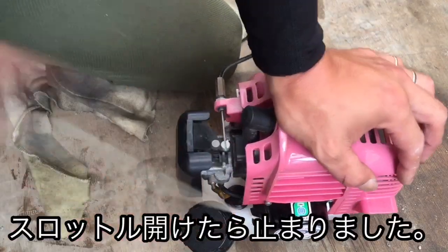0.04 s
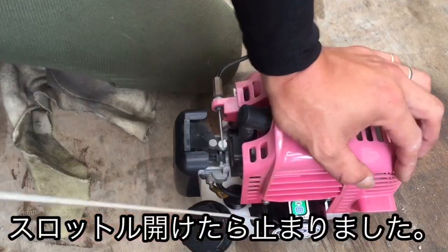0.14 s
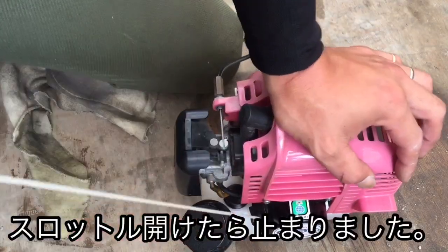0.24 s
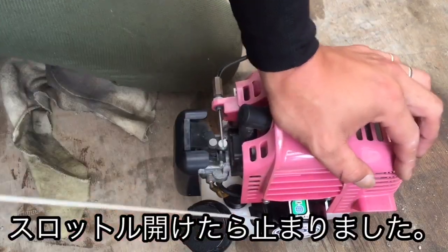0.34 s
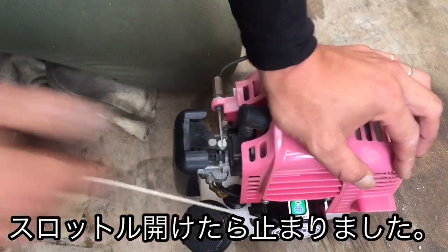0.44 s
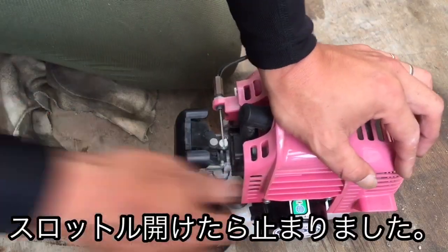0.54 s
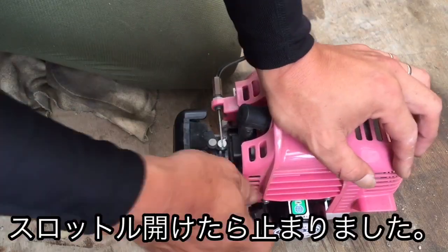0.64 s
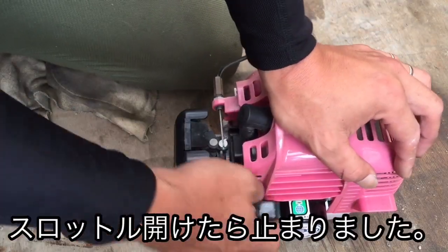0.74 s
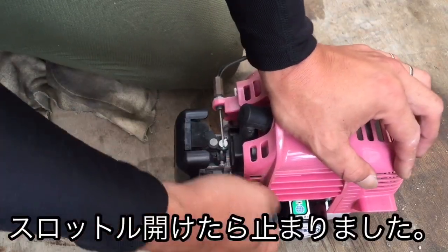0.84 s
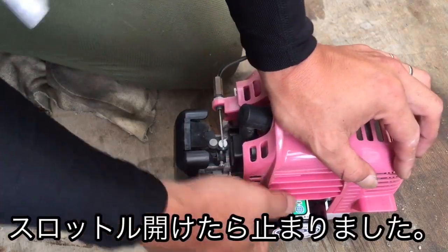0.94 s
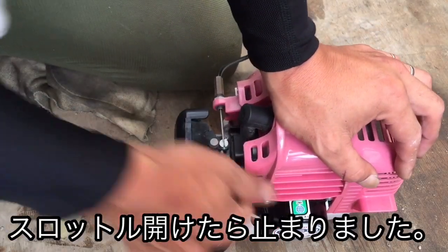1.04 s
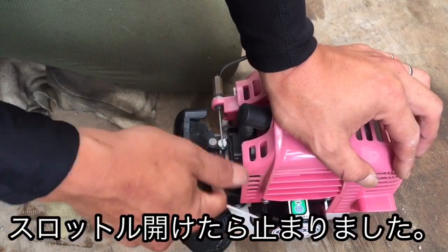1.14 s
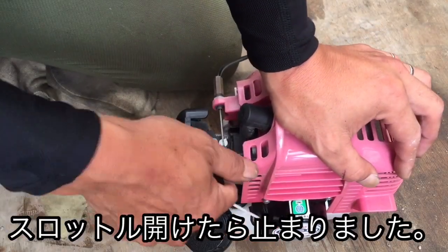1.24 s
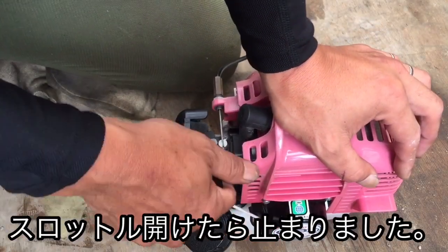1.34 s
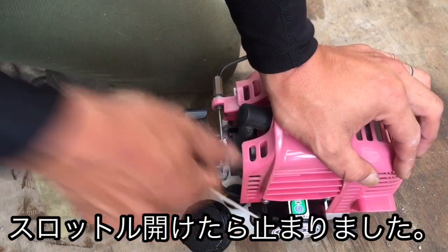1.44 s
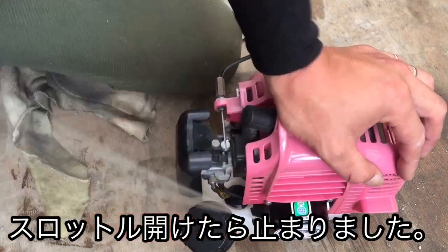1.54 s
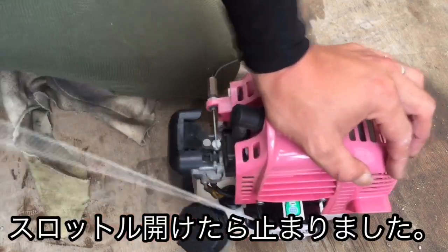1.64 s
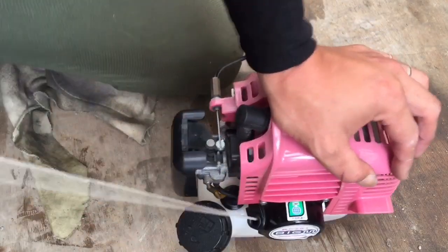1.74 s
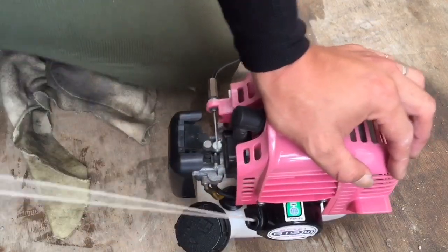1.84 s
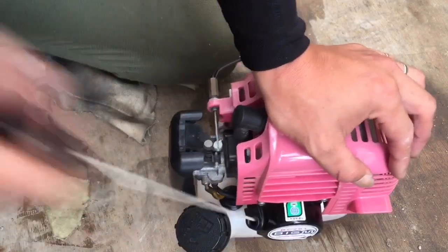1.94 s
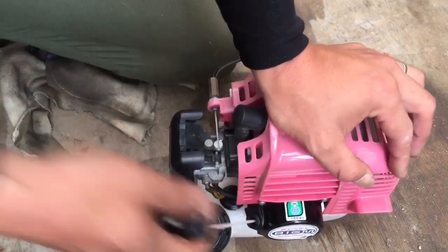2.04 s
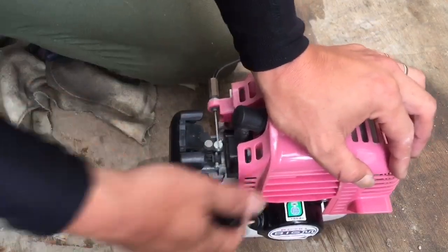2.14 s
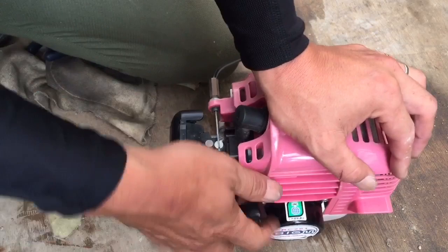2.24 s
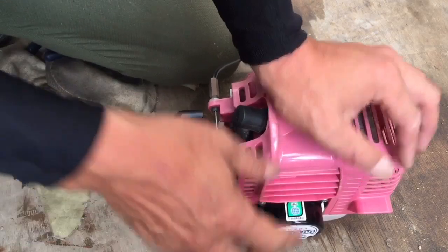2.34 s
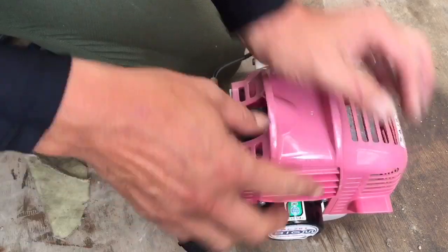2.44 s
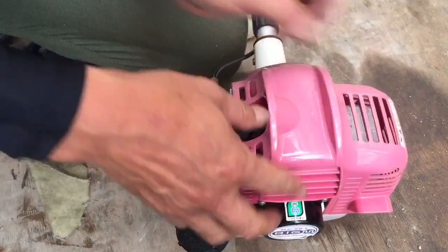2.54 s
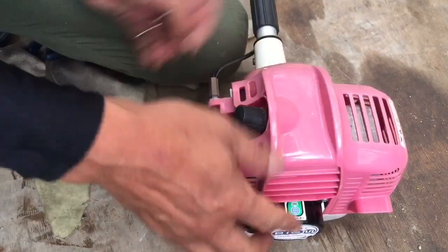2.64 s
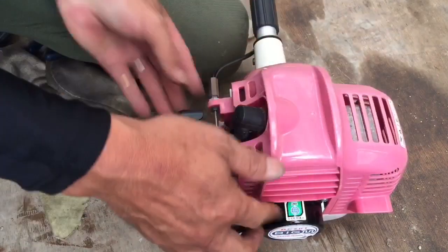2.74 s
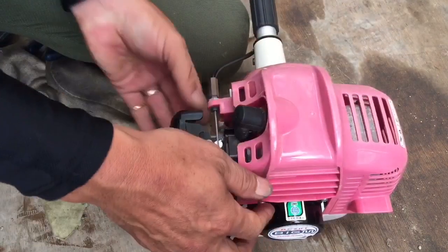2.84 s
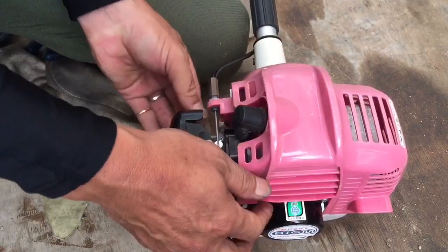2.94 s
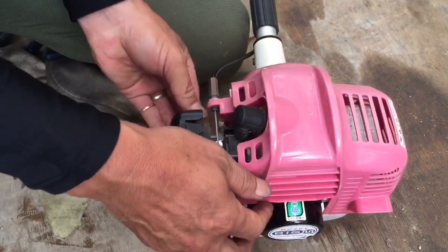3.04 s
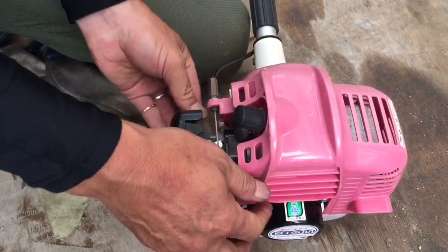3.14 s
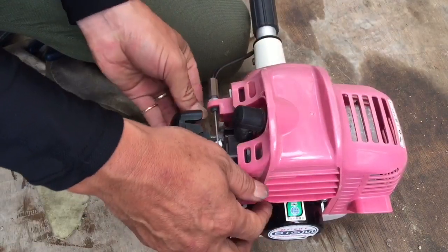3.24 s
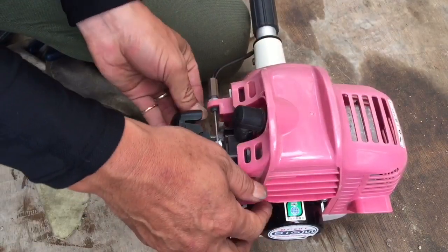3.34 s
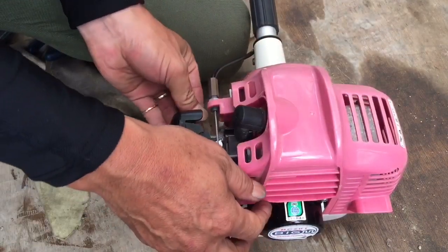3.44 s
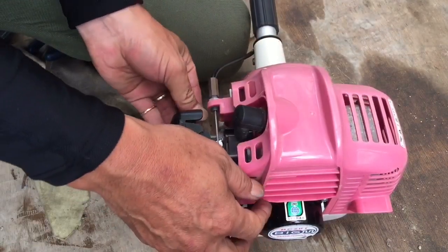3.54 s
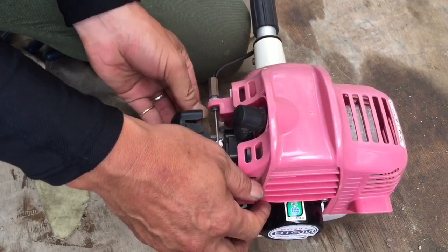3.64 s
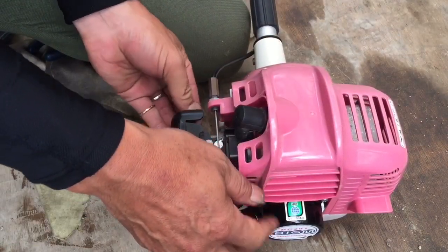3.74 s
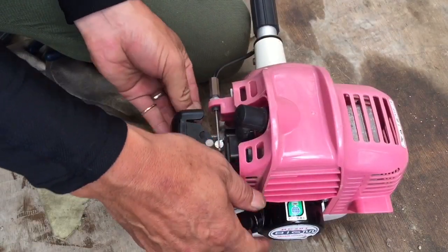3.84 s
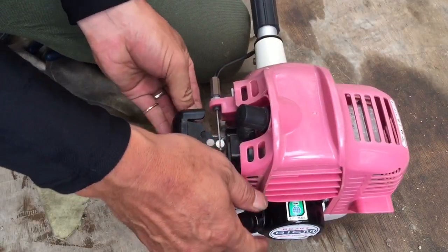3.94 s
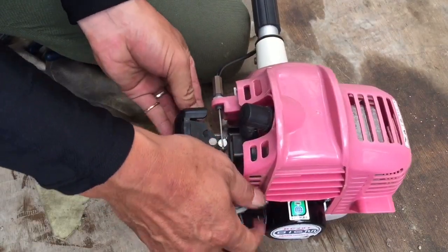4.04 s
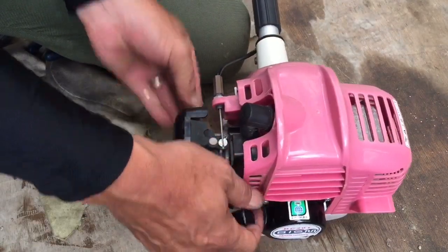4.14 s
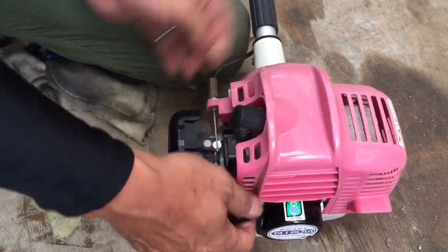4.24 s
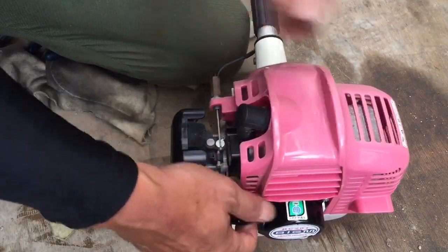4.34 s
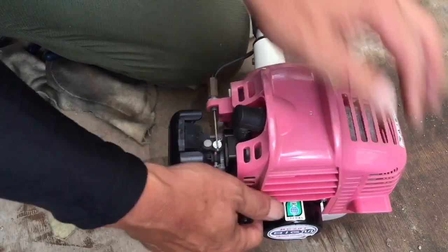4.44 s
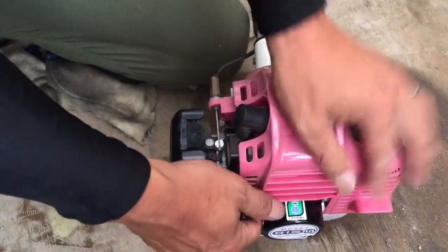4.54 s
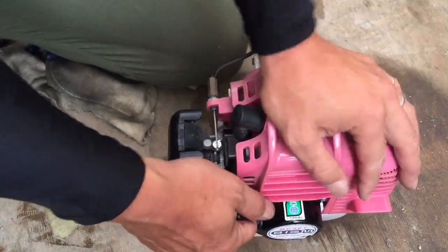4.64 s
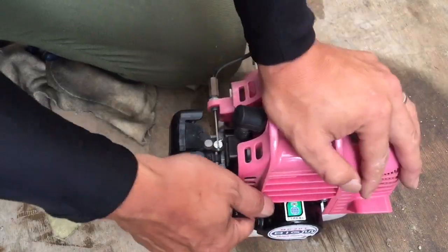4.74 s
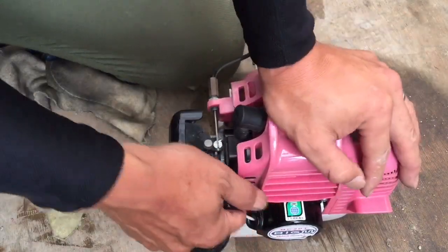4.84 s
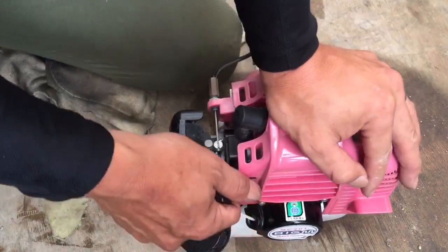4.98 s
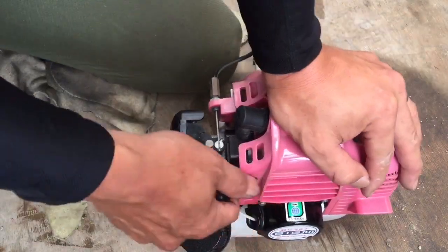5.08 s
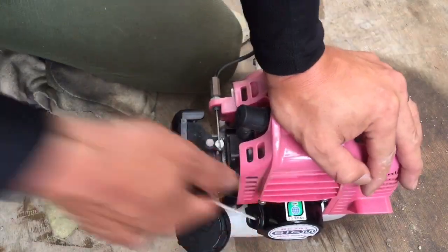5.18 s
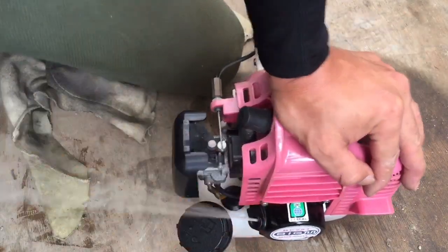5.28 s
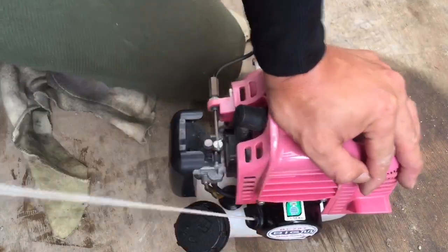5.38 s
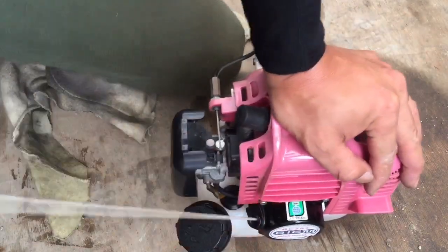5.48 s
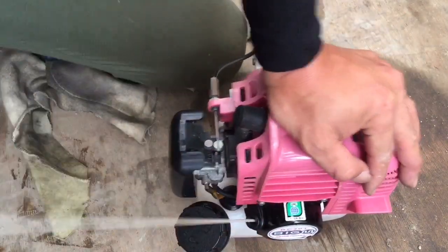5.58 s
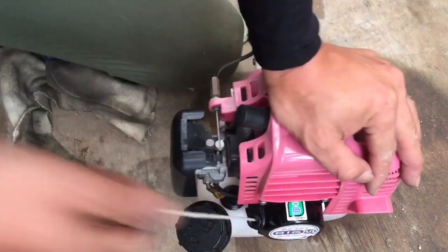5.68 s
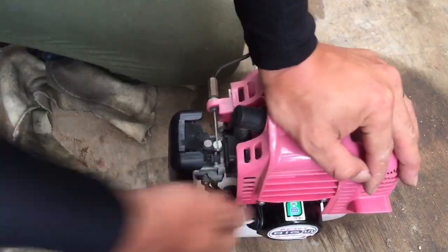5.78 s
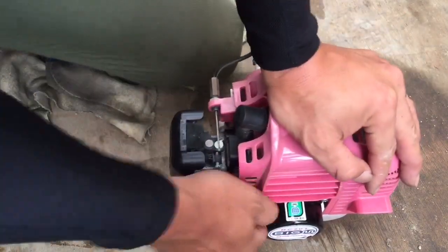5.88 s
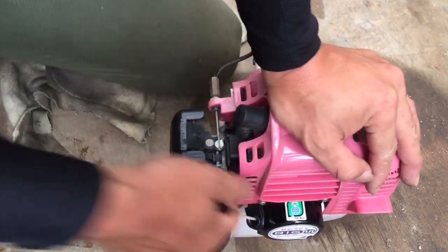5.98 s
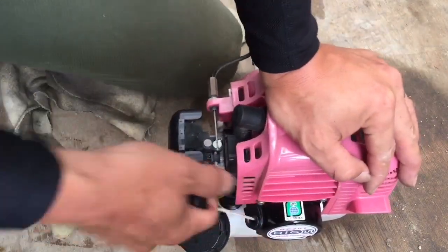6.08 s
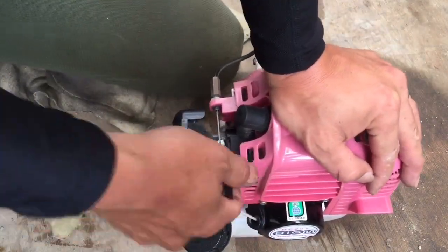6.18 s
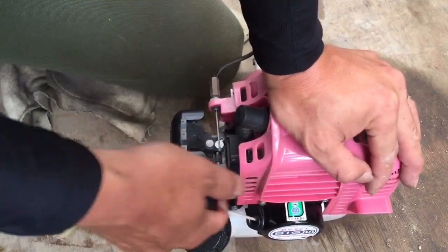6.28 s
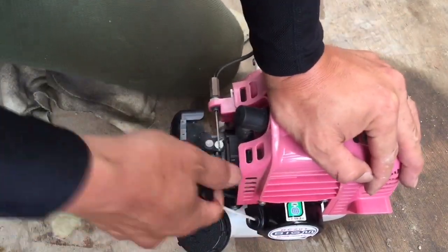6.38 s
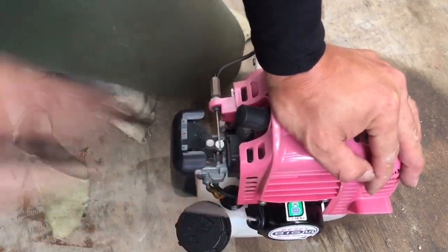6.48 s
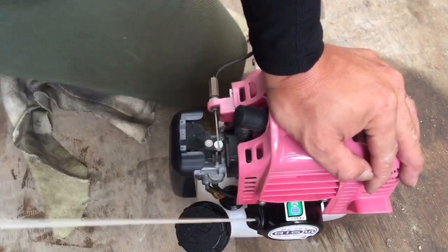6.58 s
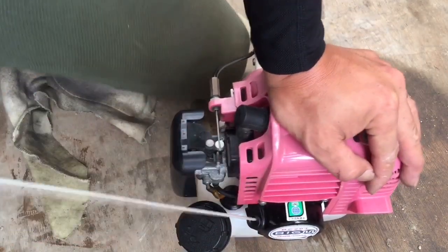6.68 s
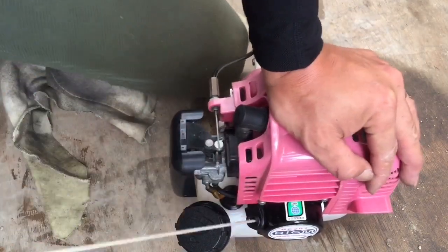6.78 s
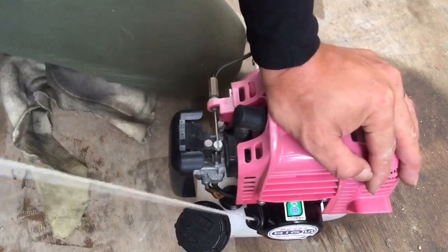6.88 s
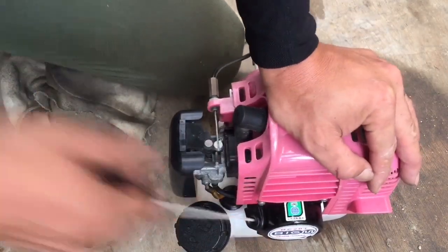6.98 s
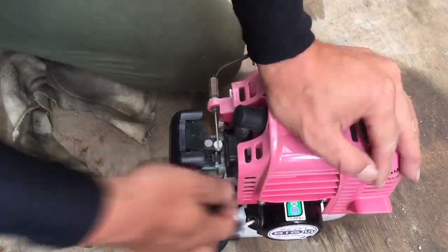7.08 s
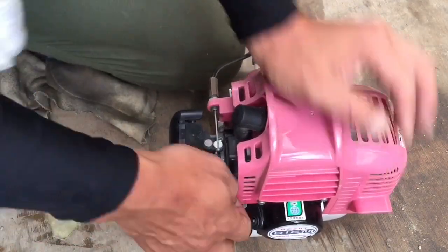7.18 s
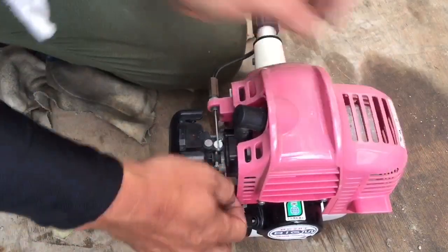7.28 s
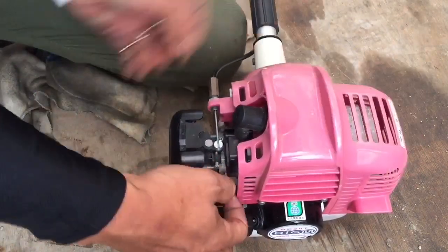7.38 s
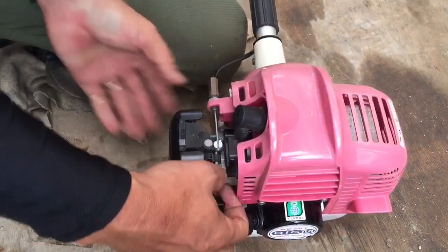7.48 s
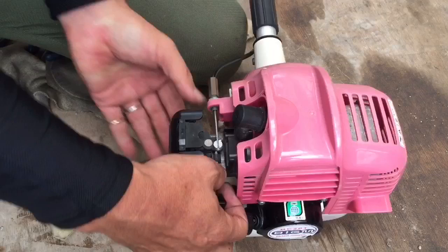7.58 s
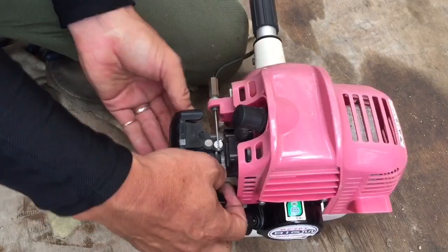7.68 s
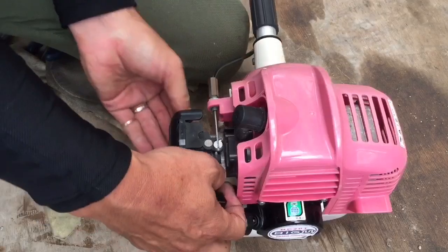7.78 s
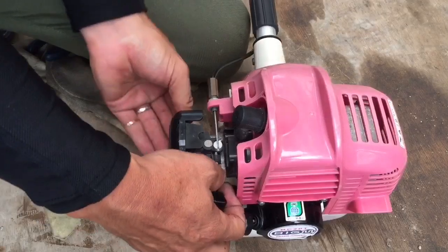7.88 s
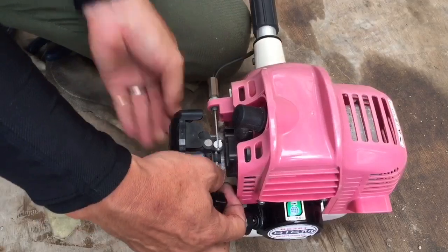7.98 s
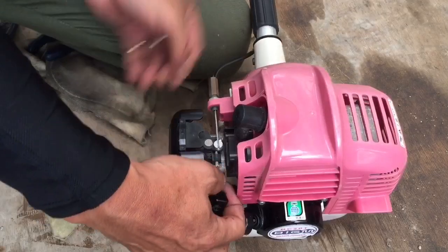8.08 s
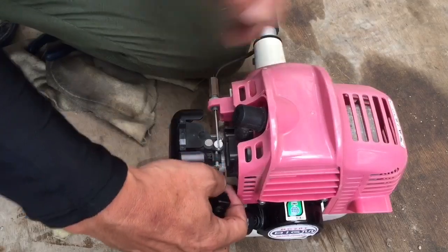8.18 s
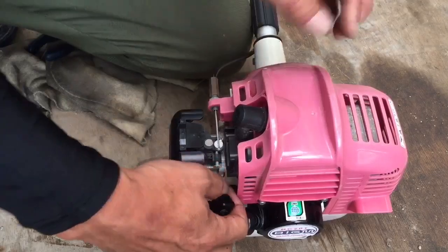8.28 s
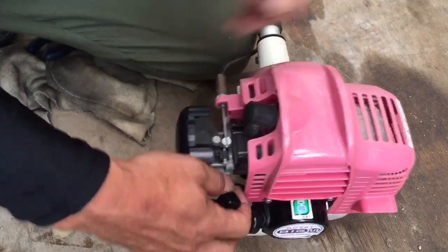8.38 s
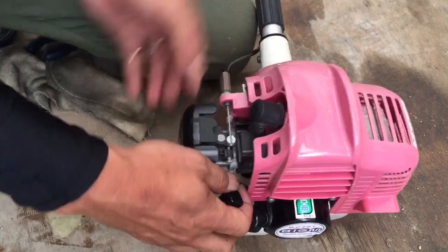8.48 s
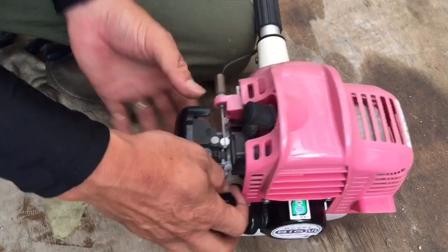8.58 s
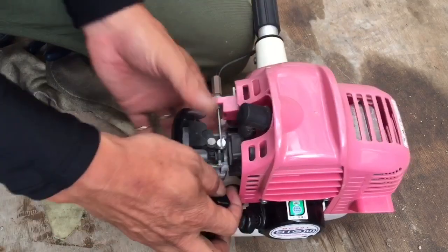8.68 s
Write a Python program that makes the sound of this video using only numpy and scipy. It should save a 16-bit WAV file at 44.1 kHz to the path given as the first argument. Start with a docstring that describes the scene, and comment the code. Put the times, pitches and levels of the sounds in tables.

```python
"""A yard, one microphone close to a small two-stroke engine that is pulled over four times by its
starter rope and does not catch. Each turn puffs through the muffler; rope, pawl and piston scrape and
clatter; the steel starter cup rings as the rope rewinds; handle and fingers knock on the plastic
housing. Far off, machinery hums, and a thin high whine throbs behind it all."""
import sys
import numpy as np
from scipy import signal
from scipy.fft import rfft, irfft, next_fast_len
from scipy.io import wavfile
from scipy.ndimage import uniform_filter1d, map_coordinates

SR = 44100
rng = np.random.default_rng(int(sys.argv[2]) if len(sys.argv) > 2 else 0)


def file_out(sig):
    """Save sig as 16-bit WAV at sys.argv[1]."""
    # one column per channel
    cols = np.atleast_2d(sig).T
    # limit, then scale
    lim = np.clip(cols, -1, 1)
    pcm = np.round(lim * 32767).astype(np.int16)
    wavfile.write(sys.argv[1], SR, pcm)


N = 384552

# modes of the steel starter cup: (frequency [Hz], level [dB], t60 [s])
CUP_MODES = [(1112, 4, 0.015), (1478, -2.5, 0.047), (2034, 4, 0.018), (2164, 2, 0.029), (2600, -5.5, 0.048),
             (3264, -10.5, 0.12), (3750, 0, 0.017), (4183, -3, 0.057), (4360, -14.5, 0.15),
             (5360, -6, 0.072), (5706, -8.5, 0.062), (6570, -5, 0.048), (9600, -23, 0.04)]
BODY_HZ = 1150  # blows pitched above this lose low band and land more quickly


def amp(db):
    """Decibels to amplitude."""
    return 10 ** (np.asarray(db) / 20)


def unit(x):
    """x at an rms of 1."""
    return x / np.sqrt(np.mean(x ** 2) + 1e-20)


def along(points, hz):
    """Read (frequency [Hz], value) points on a log axis."""
    f, values = np.transpose(points)
    return np.interp(np.log(hz + 1), np.log(f + 1), values)


def wobble(rate):
    """A smooth random curve, rate knots a second."""
    return map_coordinates(rng.standard_normal(int(N * rate / SR) + 4), [np.arange(N) * rate / SR])


def filtered(x, response):
    """x through a complex frequency response."""
    size = next_fast_len(x.shape[-1] + 8192)
    return irfft(rfft(x, size) * response(np.fft.rfftfreq(size, 1 / SR)), size)[..., :x.shape[-1]]


def fading(x, seconds):
    """Give every sample an exponential tail."""
    return signal.lfilter([1], [1, -np.exp(-1 / (seconds * SR))], x)


def resonances(modes):
    """Causal response of modes: (frequency [Hz], width [Hz], level [dB], polarity)."""
    return lambda f: sum(sign * amp(db) * 1j * f * width / (hz * hz - f * f + 1j * f * width)
                         for hz, width, db, sign in modes)


def three_bands(x):
    """Low, middle and high band of x, each at an rms of 1."""
    return [unit(filtered(x, lambda f: 1 / (1 + (lo / (f + 1)) ** 8) / (1 + (f / hi) ** 8)))
            for lo, hi in [(450, 1500), (1500, 7000), (7000, 20000)]]


def patchy(x, depth_db, bins, frames):
    """x with random patches of gain in time and frequency."""
    spectra = signal.stft(x, nperseg=256)[2]
    patches = uniform_filter1d(rng.standard_normal(spectra.shape), size=bins, axis=0)
    patches = uniform_filter1d(patches, size=frames, axis=1)
    return signal.istft(spectra * amp(depth_db * unit(patches)), nperseg=256)[1][:N]


def yard():
    """Far off: patchy rumble and hiss under the wavering hum of machinery."""
    # spectrum of the rumble and hiss: (frequency [Hz], relative density [dB])
    spectrum = [(15, -50.5), (25, -15), (91, -3.5), (140, -6), (188, -1.5), (389, -18), (457, -16.5),
                (495, -27), (782, -22.5), (895, -24), (2630, -34.5), (3000, -36), (3260, -37),
                (13000, -49.5), (14300, -59), (15500, -57.5)]
    # machinery and mains tones: (frequency [Hz], rms level [dB], waver [dB])
    hum_tones = [(104.6, -81.5, 6), (205.3, -77.5, 2), (235.5, -88, 5), (302, -93.5, 3.5), (464, -83, 0.5),
                 (2902.5, -111, 1), (2919.3, -100, 1.5), (2936, -109, 1), (2945.2, -95, 1.8),
                 (2961.6, -110, 1), (2971, -104, 2), (3408, -105.5, 4), (3705, -109, 4), (3849, -109, 3),
                 (4210, -108, 3.5), (4237, -108, 3.5)]
    t = np.arange(N) / SR
    noise = patchy(rng.standard_normal(N), 1.5, bins=3, frames=24)
    out = amp(-69.5 + 0.48 * wobble(2.4)) * unit(filtered(noise, lambda f: amp(along(spectrum, f))))
    for hz, db, waver_db in hum_tones:
        level = np.sqrt(2) * amp(db + waver_db * wobble(21))
        out += level * np.sin(2 * np.pi * hz * t + 0.18 * waver_db * wobble(9.7))
    return out


def whine():
    """In the background, thin and very high tones throb together at a steady rate."""
    # closely spaced tones: (frequency [Hz], rms level before the throb [dB])
    tones = [(15450, -107), (15552, -96), (15617, -106), (15685, -90.5)]
    throb_hz, depth, peak_s = 16.65, .6, .025
    t = np.arange(N) / SR
    out = np.zeros(N)
    for hz, db in tones:
        out += np.sqrt(2) * amp(db + 1.5 * wobble(21)) * np.sin(2 * np.pi * hz * t + .5 * wobble(16))
    return out * (1 + depth * np.cos(2 * np.pi * throb_hz * (t - peak_s)))


def walls(x):
    """The surrounding walls answer about 7 ms late; the treble dies first."""
    # decay of the reflections: (frequency [Hz], t60 [s])
    decay = [(200, 0.35), (2000, 0.23), (10000, 0.17)]
    hz, t, spectra = signal.stft(rng.standard_normal(SR // 2), SR, nperseg=256)
    tail = signal.istft(spectra * amp(-60 * t / along(decay, hz)[:, None]), SR, nperseg=256)[1]
    return signal.fftconvolve(np.pad(x, (300, 0)), tail / np.linalg.norm(tail))[:N]


def rewinding(s):
    """True while the pawl has let go and the rope runs back into the free-ringing cup."""
    # rewinds of the rope: (start [s], end [s])
    rewinds = [(2.07, 2.3), (5.67, 5.9), (6.84, 7.3)]
    return sum((s >= start) & (s < end) for start, end in rewinds) > 0


def friction(strokes, spectrum, catches_per_s, catch_db, grain_db, colour_db):
    """Grainy noise that catches and slips; part of it rings through the steel cup.
    Each stroke is a curve of (time [s], level [dB], low band [dB], high band [dB])."""
    catches = (rng.random(N) < catches_per_s / SR) * rng.exponential(size=N)
    slips = 1 + amp(catch_db) * fading(catches, 0.0028)
    grit = slips * amp(grain_db * wobble(600)) * rng.standard_normal(N)
    grit = patchy(grit, colour_db, bins=8, frames=4)
    low, middle, high = three_bands(filtered(grit, lambda f: amp(along(spectrum, f))))
    cup = resonances([(hz, 2.2 / t60, db + 3 * np.log(t60), (-1) ** k)
                      for k, (hz, db, t60) in enumerate(CUP_MODES)])
    cup_share = np.where(rewinding(np.arange(N) / SR), .24, .12)
    middle = np.sqrt(1 - cup_share) * middle + np.sqrt(cup_share) * unit(filtered(grit, cup))
    out = np.zeros(N)
    for stroke in strokes:
        s, *levels = np.transpose(stroke)
        span = np.arange(round(s[0] * SR), round(s[-1] * SR))
        fade = np.minimum(1, np.minimum(span - span[0], span[-1] - span) / 400)
        gain, low_gain, high_gain = [amp(np.interp(span / SR, s, db)) for db in levels]
        out[span] += fade * gain * (middle[span] + low_gain * low[span] + high_gain * high[span])
    return out


def thinning(hz):
    """Low-band gain of a blow in dB: the higher its pitch, the thinner it is."""
    return np.clip(-9 * np.log2(hz / BODY_HZ), -12, 0)


def blows(events, modes, ring_db, gain_db, attack_s, spread):
    """Each blow is a noise burst plus the body's modes, strongest near its own pitch.
    Events: (time [s], level [dB], low band [dB], high band [dB], t60 [s], pitch [Hz])."""
    floor_hz = 610  # a blow carries little below this
    out, t = np.zeros(N + SR), np.arange(SR // 3) / SR
    for s, db, low_db, high_db, t60, pitch in events:
        dull_db = max(0, -high_db)  # a dull blow is narrower, rings more and rolls off sooner
        rise_s = attack_s * np.sqrt(BODY_HZ / pitch)  # a higher blow is a harder, quicker contact
        damping = min(1, t60 / 0.023)  # a short blow stays in contact and deadens the ring
        ring = np.zeros(len(t))
        for hz, mode_db, mode_t60 in modes:
            near_db = 10 * np.exp(-(np.log(hz / pitch) / .07) ** 2)
            envelope = amp(mode_db + near_db + rng.normal(0, 4.7) - 60 * t / (mode_t60 * damping))
            ring += envelope * np.sin(2 * np.pi * hz * rng.normal(1, 0.0079) * t)
        burst = rng.standard_normal(len(t)) * amp(-60 * t / max(t60, .003))
        width = spread / (1 + 0.037 * dull_db)
        burst = filtered(burst, lambda f: 1 / (1 + (np.log((f + 1) / pitch) / width) ** 2))
        onset = (1 - np.exp(-t / rise_s)) ** 2
        sound = onset * (burst + amp(ring_db + 0.26 * (dull_db - 12)) * ring)
        rolloff = lambda f: amp(-0.22 * dull_db * np.clip(np.log((f + 1) / (1.2 * pitch)) / 2.1, 0, 1))
        sound = filtered(sound, lambda f: rolloff(f) / (1 + (floor_hz / (f + 1)) ** 4))
        # each band's level is that of its first milliseconds
        low, middle, high = [band / np.sqrt(np.mean(band[:200] ** 2)) for band in three_bands(sound)]
        start = round((s - rise_s) * SR)
        out[start:][:len(t)] += amp(db + gain_db) * (middle + amp(low_db) * low + amp(high_db) * high)
    return out[:N]


def finger_rubs():
    """Fingers and sleeve rub on the housing; each rub swells and falls away."""
    # rubs: (peak time [s], level [dB], rise [s], fall [s], low band re rub [dB], high band re rub [dB])
    rubs = [(1.0, -83.5, 0.18, 0.16, 10, -10), (1.11, -70.5, 0.057, 0.088, -9, -12),
            (1.175, -70, 0.077, 0.074, -4, -25.5), (1.23, -71, 0.077, 0.062, -10, -26),
            (2.335, -64.5, 0.059, 0.06, 2, -14.5), (6.075, -64, 0.049, 0.098, -7.5, -22),
            (6.15, -58, 0.059, 0.062, -6.5, -19.5), (7.79, -76, 0.12, 0.2, -14, -30),
            (7.96, -76, 0.05, 0.057, -12, -20), (8.077, -64, 0.027, 0.027, -9, -4),
            (8.03, -77.5, 0.17, 0.23, -20, 3), (8.125, -63, 0.082, 0.059, 1.5, -17),
            (8.364, -65, 0.038, 0.096, -3, -0.5)]
    # spectrum of the rubbing: (frequency [Hz], relative density [dB])
    spectrum = [(260, -13), (450, 11), (515, -1), (794, 11), (1260, 3), (1600, 6.5), (6150, -19),
                (13600, -49.5), (14800, -66), (16000, -27)]
    fade_db = 21
    strokes = [[(s - rise, db - fade_db, *bands), (s, db, *bands), (s + fall, db - fade_db, *bands)]
               for s, db, rise, fall, *bands in rubs]
    return friction(strokes, spectrum, catches_per_s=240, catch_db=-0.5, grain_db=1, colour_db=0)


def housing_knocks():
    """Handle and fingers knock on the plastic housing, which rings briefly."""
    # knocks: (time [s], level [dB], pitch [Hz], high band re knock [dB], t60 [s])
    knocks = [(0.6998, -35, 2140, -3.5, 0.021), (0.714, -23.5, 1740, -23, 0.016),
              (0.7219, -27.5, 1960, -5, 0.04), (0.835, -69, 5600, -14, .01), (0.848, -72, 6300, -1, 0.011),
              (0.982, -72, 1050, -25, .025), (1.008, -71.5, 1900, -12, 0.018),
              (0.8992, -69, 5470, -21, .02), (1.091, -63, 3020, -12, 0.017), (1.096, -46, 1120, -3, 0.021),
              (1.109, -57, 1650, -26, 0.03), (1.139, -62, 2010, -29.5, 0.02),
              (2.3065, -47.5, 6900, -10, 0.02), (2.311, -50, 2900, -9.5, 0.035),
              (2.3144, -61, 1300, -13, 0.022), (2.3253, -51.5, 5400, -11.5, 0.014),
              (2.3264, -60, 900, -20, 0.035), (2.3388, -53.5, 5400, -11.5, 0.011),
              (2.341, -52.5, 1190, -20, 0.02), (2.357, -68.5, 1600, -14, 0.03),
              (2.376, -68, 1000, -23, 0.02), (2.5004, -59.5, 1650, -44, 0.014),
              (2.501, -59, 2410, -47, 0.027), (2.5575, -68, 6470, -11, .027), (4.228, -64, 5480, -19, 0.02),
              (4.3331, -63.5, 1090, -8, 0.046), (4.3504, -57, 1140, -15, 0.022),
              (4.3787, -64, 6400, -21, 0.039), (4.4363, -69.5, 860, -21, 0.059),
              (4.5887, -69.5, 840, -15, 0.061), (4.639, -70, 830, -23.5, 0.036),
              (4.691, -52, 4240, -14, 0.025), (4.692, -58, 1300, -26, 0.039),
              (4.706, -64, 1500, -11.5, 0.053), (5.606, -46, 1400, -28, 0.02),
              (5.618, -32, 1276, -32, 0.012), (5.6186, -29, 2900, -19, 0.0082),
              (5.9048, -40.5, 5700, -9, 0.012), (5.907, -34.5, 1340, -19.5, 0.044),
              (5.9355, -46, 2100, -9, 0.044), (5.952, -58, 1090, -15.5, 0.016),
              (6.048, -58, 1500, -22, 0.01), (6.059, -45, 1090, -5.5, 0.019),
              (6.137, -54, 2360, -26, 0.047), (7.239, -56.5, 1670, -24.5, 0.011),
              (7.285, -56, 1680, -29, 0.018), (7.3068, -44.5, 1570, -27, 0.0082),
              (7.364, -70, 946, -20, 0.018), (7.9384, -64, 2850, -5.5, 0.01),
              (7.9359, -60, 5900, 2, 0.0092), (7.9919, -63, 6550, -6, 0.0062),
              (8.016, -77.5, 6000, -4, 0.02), (8.045, -73, 5900, -4, 0.02), (8.068, -69, 1500, -14, 0.03),
              (8.097, -64, 1660, -22, 0.025), (8.112, -71, 960, -22, 0.017), (8.123, -66, 1130, -20, 0.03),
              (8.137, -63, 1500, -26, 0.02), (8.152, -70, 2000, -25, 0.02), (8.3443, -54, 5560, -2, 0.048),
              (8.3482, -59.5, 930, -5, 0.049), (8.3647, -55.5, 960, -2.5, 0.019)]
    # modes of the housing: (frequency [Hz], level [dB], t60 [s])
    housing_modes = [(725, -2, 0.017), (1130, 3, 0.021), (1360, -2, 0.019), (1648, -3.5, 0.025),
                     (1953, -4.5, 0.026), (2385, -2.5, 0.013), (3460, -18.5, 0.0061), (4070, -17, 0.033),
                     (5500, -18.5, 0.018), (6480, -12.5, .012), (8600, -24, 0.01)]
    events = [(s, db, 2.5 + thinning(hz), high_db, t60, hz) for s, db, hz, high_db, t60 in knocks]
    return blows(events, housing_modes, ring_db=-12.5, gain_db=-8, attack_s=.0016, spread=0.65)


def rocking_and_ringing():
    """The engine rocks on the ground; thin steel parts ring on once rope or handle stops."""
    # low thuds of the rocking: (time [s], level [dB], frequency [Hz], t60 [s])
    thuds = [(0.712, -24.5, 177, 0.034), (5.905, -42, 212, 0.077), (7.97, -38.5, 74.6, 0.035),
             (8.533, -51, 62, 0.31)]
    # ringing steel parts: (time [s], level [dB], frequency [Hz], t60 [s])
    rings = [(.722, -60, 1896, .52), (.722, -66, 1913, .4), (.722, -61, 1630, 0.3),
             (7.183, -64, 4400, 0.32), (7.182, -74, 3240, .3)]
    out, t = np.zeros(N + SR), np.arange(SR // 2) / SR
    onset = 1 - np.exp(-t / 0.0053)
    for s, db, hz, t60 in thuds + rings:
        out[round(s * SR):][:len(t)] += onset * amp(db - 60 * t / t60) * np.sin(2 * np.pi * hz * t)
    return out[:N]


def rope_scrape():
    """The starter rope scrapes, brighter as it gets louder and duller as it runs back."""
    # one curve a pull, from slack to rewind: (time [s], level [dB], low band re scrape [dB])
    pulls = [
        [(0.03, -78, -6), (0.105, -61.5, -8), (0.125, -50, -4.5), (0.2, -47, -1), (0.275, -44, 0.5),
         (0.31, -52, -3), (0.45, -47.5, -9.5), (0.6, -52.5, -4.5), (0.69, -51.5, -14), (0.74, -52, 7.5),
         (0.78, -70, 4.5), (0.86, -94, -9)],
        [(1.5, -92, 3), (1.585, -66.5, -8), (1.605, -46, -10.5), (1.63, -53, -3), (1.685, -40.5, -5.5),
         (1.725, -43.5, -5.5), (1.8, -52, 2), (1.862, -50.5, 2.5), (1.93, -49, -2.5), (1.946, -49, -9),
         (1.962, -46.5, -23), (2.03, -61, 0), (2.068, -62.5, -8), (2.125, -49.5, -24), (2.17, -55, -16),
         (2.24, -70.5, -2.5), (2.3, -81.5, -16)],
        [(5.24, -96, -3), (5.285, -70, -1), (5.32, -69, -9), (5.345, -48, -9), (5.39, -49, 1), (5.5, -43, -6.5),
         (5.565, -52, -20), (5.595, -41, -15.5), (5.63, -44.5, -11), (5.665, -56.5, -2.5), (5.72, -44.5, -21),
         (5.8, -50.5, -16), (5.86, -49, -14), (5.945, -64.5, 6), (6.0, -75, -9)],
        [(6.46, -104, -8), (6.53, -71, 0), (6.57, -54, -13.5), (6.71, -45, -7), (6.83, -55, -15),
         (6.9, -43, -19), (7.02, -56.5, -13), (7.08, -49, -28), (7.17, -64.5, -16), (7.22, -70, -4),
         (7.3, -83, -12)],
    ]
    # spectrum of the scrape: (frequency [Hz], relative density [dB])
    spectrum = [(260, -34.5), (450, 0), (500, -3), (818, -6.5), (908, -6.5), (1120, -6.5), (1750, 0.5),
                (2620, 0), (2870, -0.5), (4230, -5), (4770, -8), (6530, -7.5), (7580, -18.5),
                (11200, -24.5), (13000, -18), (16000, -32.5)]
    brightest_at_db = -49.5
    high_db = lambda s, db: -12 if rewinding(s) else -7 + 0.2 * min(0, db - brightest_at_db)
    strokes = [[(s, db, low_db, high_db(s, db)) for s, db, low_db in pull] for pull in pulls]
    return friction(strokes, spectrum, catches_per_s=300, catch_db=-8, grain_db=1.5, colour_db=3.5)


def compressions():
    """One compression for every whole turn of the crankshaft: (time [s], level [dB])."""
    # the crankshaft, one curve a pull: (time [s], speed [turns/s], puff level [dB])
    crank_curves = [
        [(0.1365, 16.2, -24.4), (0.179, 30.78, -35.9), (0.194, 35.93, -25), (0.252, 33.03, -35.5),
         (0.279, 40.53, -36), (0.292, 39.43, -35.4), (0.317, 37.32, -29.3), (0.424, 28.29, -28.6),
         (0.4428, 34.18, -30), (0.455, 38.01, -27.5), (0.47, 35.36, -25.8), (0.558, 19.82, -32.7),
         (0.582, 27.24, -32.5), (0.597, 31.88, -27), (0.6584, 18.19, -29.2)],
        [(1.6161, 20.25, -24.9), (1.665, 41.06, -27.1), (1.779, 28.2, -30.2), (1.807, 47.83, -34.8),
         (1.834, 28.25, -29.6), (1.895, 35.99, -28.3), (2.012, 16.2, -29.5), (2.1171, 11.77, -43.7)],
        [(5.3572, 24.39, -24.5), (5.394, 30.25, -29.5), (5.438, 37.26, -25.5), (5.489, 42.1, -28.2),
         (5.628, 16.0, -29.4), (5.7325, 12.07, -42.9)],
        [(6.5795, 15.58, -25.6), (6.642, 31.91, -25.9), (6.711, 40.97, -28.8), (6.784, 28.71, -28.3),
         (6.833, 13.23, -26), (6.9385, 14.38, -46.3)],
    ]
    events = []
    for curve in crank_curves:
        s, speed, db = np.transpose(curve)
        t = np.arange(s[0], s[-1], 1 / SR)
        turns = np.cumsum(np.interp(t, s, speed)) / SR
        times = np.interp(np.arange(round(turns[-1]) + 1), turns, t)
        events += zip(times, np.interp(times, s, db))
    return events


def clatter():
    """The pawl strikes and the piston slaps just before each puff; both ring the steel cup."""
    # pawl blows: (time [s], level [dB], pitch [Hz], high band re blow [dB])
    pawl_blows = [(0.1292, -40.5, 980, -1), (0.1936, -43.5, 2630, -4.5), (0.2515, -35, 2210, -11),
                  (0.274, -38, 2980, -3), (0.344, -42.5, 1220, 0), (0.4379, -34, 1204, -2.5),
                  (0.4647, -38.5, 1110, -14.5), (0.487, -36.5, 2620, -17), (0.579, -40, 6500, -3),
                  (0.6377, -49, 2130, -3.5), (1.651, -35, 2410, -3), (1.663, -36, 3900, -8.5),
                  (1.7035, -40, 2070, 0.5), (1.7245, -35.5, 2580, -14), (1.763, -39.5, 6100, 2),
                  (1.789, -41, 960, -21), (1.8793, -39, 6100, 2.5), (2.0049, -48, 1870, -0.5),
                  (2.043, -51.5, 6500, -4.5), (2.076, -51.5, 1200, -21), (2.0864, -38.5, 4000, -12.5),
                  (2.1167, -37.5, 1970, -12.5), (2.152, -38.5, 1880, -14), (2.178, -49, 1490, -11),
                  (2.209, -52, 2570, -18), (2.2305, -53.5, 3400, -32), (5.3533, -45, 1090, -3),
                  (5.393, -41.5, 1050, 1), (5.412, -35.5, 4330, -12.5), (5.466, -40, 2080, -8.5),
                  (5.4894, -42, 1210, -18.5), (5.4988, -40, 2180, -9), (5.5434, -42.5, 3220, -4),
                  (5.6824, -41, 3660, -14), (5.707, -34, 1820, -10.5), (5.7234, -40, 1100, -11.5),
                  (5.7418, -36.5, 4200, -11.5), (5.7673, -40, 2560, -9.5), (5.7645, -41.5, 1110, -11),
                  (5.792, -36, 1120, -17), (5.81, -49, 6500, -4), (5.8246, -37.5, 2860, -20.5),
                  (5.846, -49, 5500, -7.5), (5.866, -47, 4170, -12.5), (5.8728, -39, 2070, -12),
                  (6.565, -40, 2310, -14.5), (6.6132, -42, 2140, -0.5), (6.6418, -41.5, 2220, -10),
                  (6.7009, -34.5, 2580, -18), (6.734, -40.5, 2180, -12), (6.782, -40.5, 2330, -10.5),
                  (6.82, -44.5, 2350, -4.5), (6.8578, -36, 3250, -11), (6.8765, -31, 3250, -12.5),
                  (6.8911, -33, 2350, -7.5), (6.9055, -33.5, 1950, -7), (6.9271, -35, 4100, -11),
                  (6.9536, -40.5, 2920, -14), (6.997, -36.5, 2030, -29), (7.03, -38.5, 2400, -15.5),
                  (7.0604, -35.5, 2090, -22), (7.1001, -39.5, 2170, -17), (7.124, -44.5, 2040, -26.5),
                  (7.1481, -40, 2060, -16.5), (7.1813, -43.5, 4470, -17)]
    events = []
    for s, db, hz, high_db in pawl_blows:
        low_db, t60 = (-7, 0.019) if rewinding(s) else (1, 0.031)
        events.append((s, db, low_db + thinning(hz), high_db, t60, hz))
    lead_s, slap_t60, slap_hz = .003, 0.032, 1070
    for s, puff_db in compressions():
        events.append((s - lead_s, puff_db + rng.normal(-27, 4.5), 6, -9, slap_t60, slap_hz))
    return blows(events, CUP_MODES, ring_db=-13.5, gain_db=-6, attack_s=.0012, spread=2.8)


def exhaust():
    """Each compression lets a smooth puff into the muffler; slow, weak puffs are longer and duller."""
    # resonances of the muffler box: (frequency [Hz], width [Hz], level [dB], polarity)
    muffler_modes = [(56.3, 66, 31.5, -1.6), (86, 58, 38, -0.65), (176, 76, 45.5, 0.78),
                     (331.2, 16, 37, -1.1), (365, 57, 42, -0.84)]
    # ring of the exhaust port: (frequency [Hz], width [Hz], level [dB], polarity)
    port_modes = [(814, 57, 10, 0.6), (1030, 66, -5, -0.7), (629, 65, 3, -0.7)]
    # a cooling fin, rung by quick compressions: (frequency [Hz], width [Hz], level [dB], polarity)
    fin_modes = [(10115, 30, 0, 1)]
    base_puff_s, quick_gap_s, weak_db = 0.0033, 0.026, -30.5
    flow, port_kicks, fin_kicks = np.zeros((3, N))
    events = compressions()
    gaps = np.diff([s for s, db in events], prepend=-1, append=99)
    for (s, db), gap in zip(events, np.minimum(gaps[1:], gaps[:-1])):
        slowness = gap / quick_gap_s
        stretch = amp(0.29 * max(0, weak_db - db) + rng.normal(0, .9)) * slowness ** 0.17
        puff_s = base_puff_s * stretch
        puff = np.hanning(round(puff_s * SR))
        start = round((s - puff_s) * SR)  # the port opens one puff length before the pressure trough
        flow[start:][:len(puff)] += amp(db) * puff / puff.sum() * stretch ** 2
        kick = amp(db + rng.normal(0, 4))
        port_kicks[start + 60] = kick
        fin_kicks[start] = kick * amp(-13.5 * np.log2(slowness))
    # air keeps swirling in the box for a while after the puff
    swirl = (fading(flow, .02) - fading(flow, .008)) * rng.standard_normal(N)
    swirl = amp(-40) * filtered(swirl, lambda f: 1 / (1 + (f / 450) ** 6))
    # the outlet radiates the change of flow
    box = filtered(flow + swirl, lambda f: 1j * f / 200 * resonances(muffler_modes)(f))
    metal = filtered(port_kicks, resonances(port_modes)) + filtered(fin_kicks, resonances(fin_modes))
    return box + amp(15.5) * metal


def scene():
    """The engine close up, its faint reflections and the yard behind, in mono."""
    engine = exhaust() + rocking_and_ringing()
    engine += amp(-2) * rope_scrape() + amp(-4.5) * finger_rubs()
    engine += clatter() + housing_knocks()
    return (engine + amp(-15.5) * walls(engine) + yard() + whine())[None]


def record(dry):
    """The microphone chain cuts the deepest bass and keeps nothing above its band limit."""
    low_cut_hz, top_hz = 46, 15950
    return filtered(dry, lambda hz: (hz < top_hz) * hz ** 2 / np.sqrt(hz ** 4 + low_cut_hz ** 4))


dry = scene()
out = record(dry)
file_out(out)
```